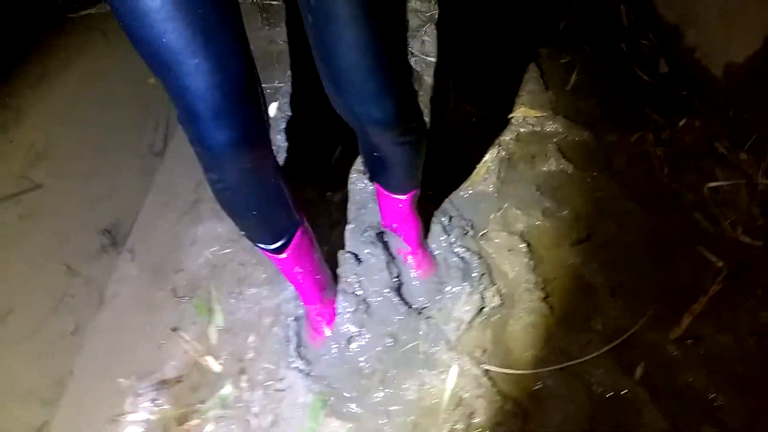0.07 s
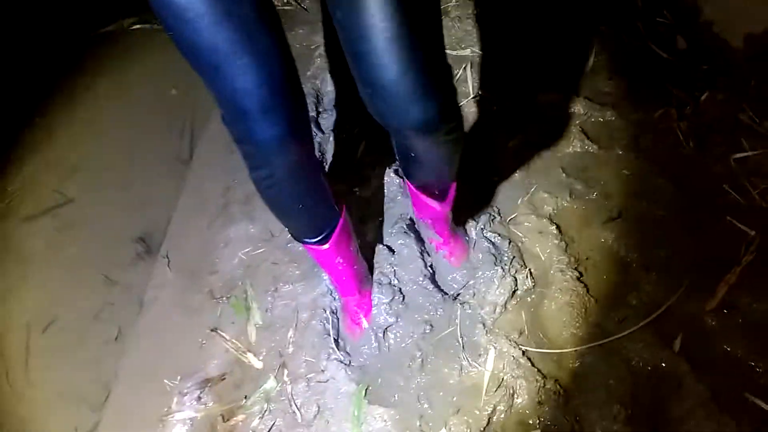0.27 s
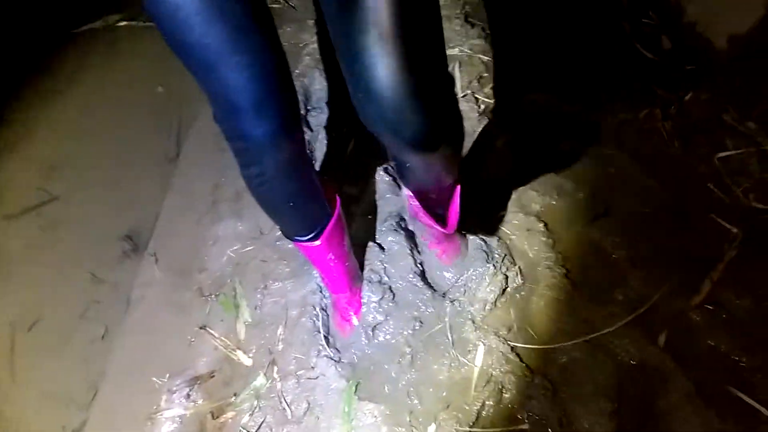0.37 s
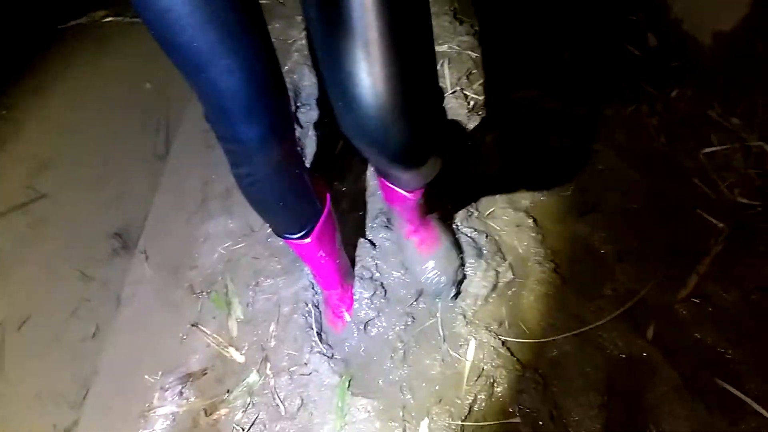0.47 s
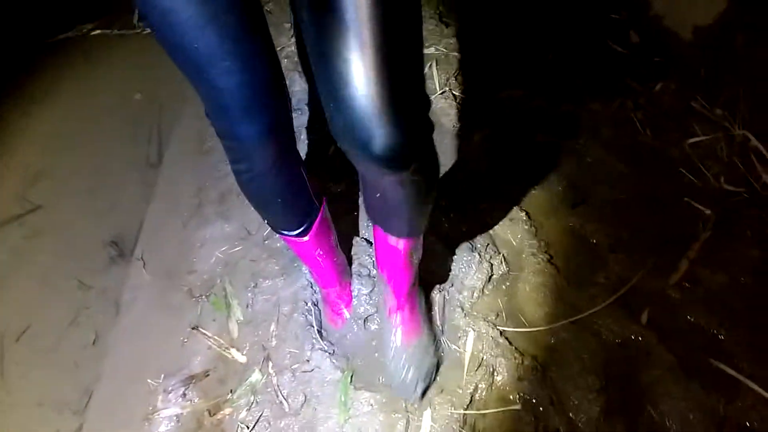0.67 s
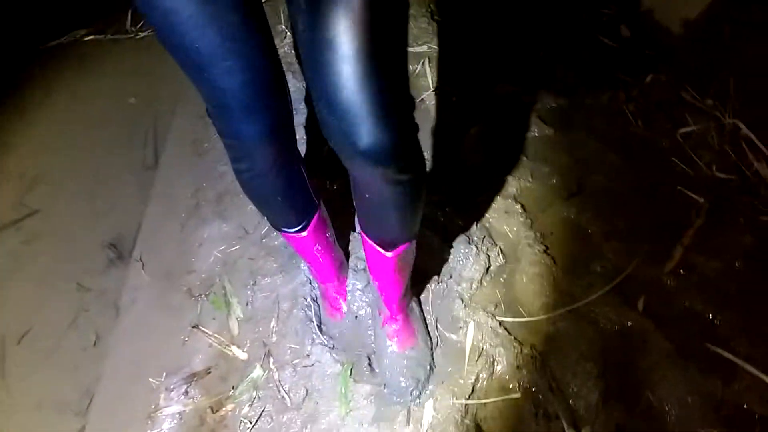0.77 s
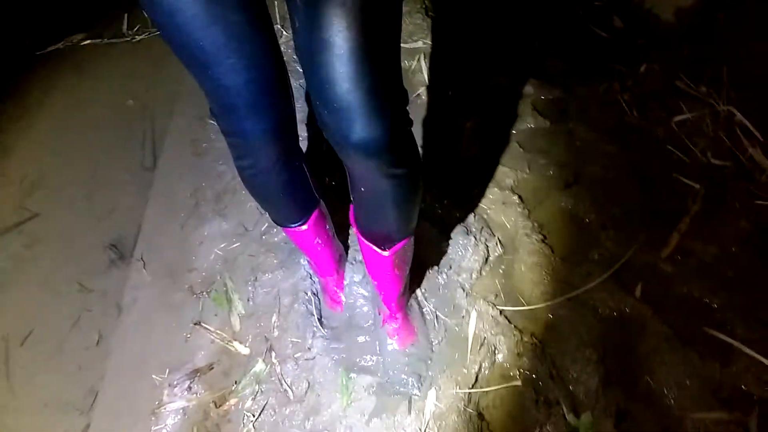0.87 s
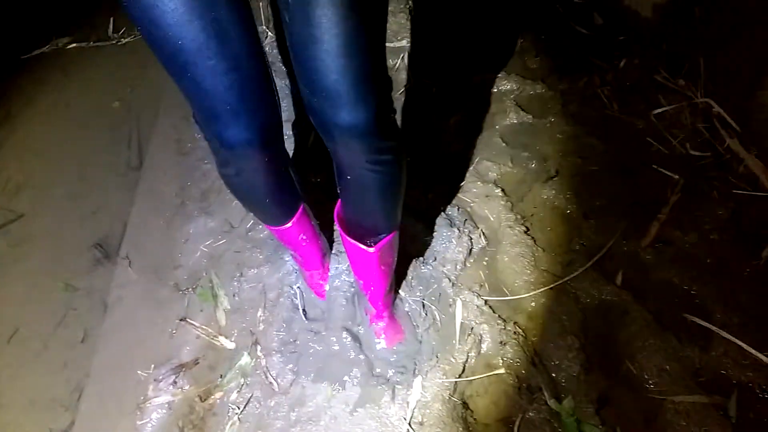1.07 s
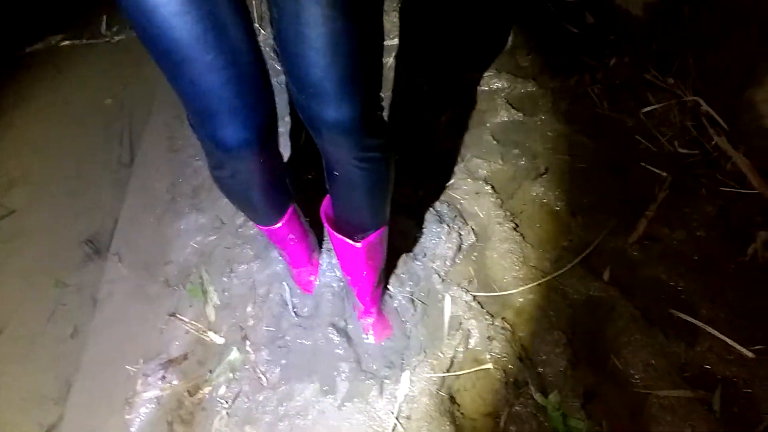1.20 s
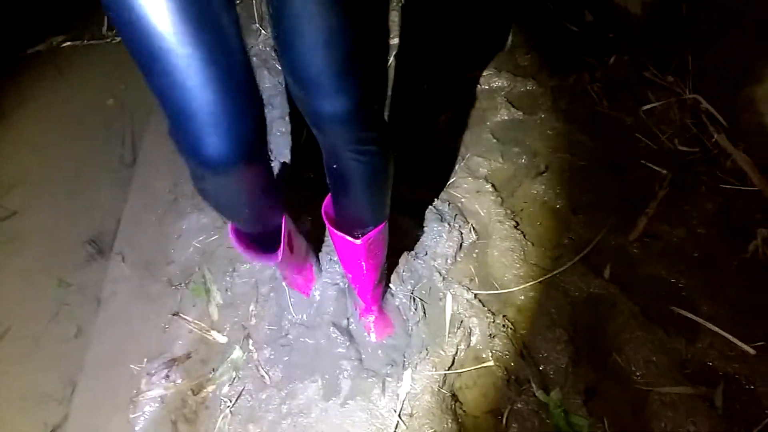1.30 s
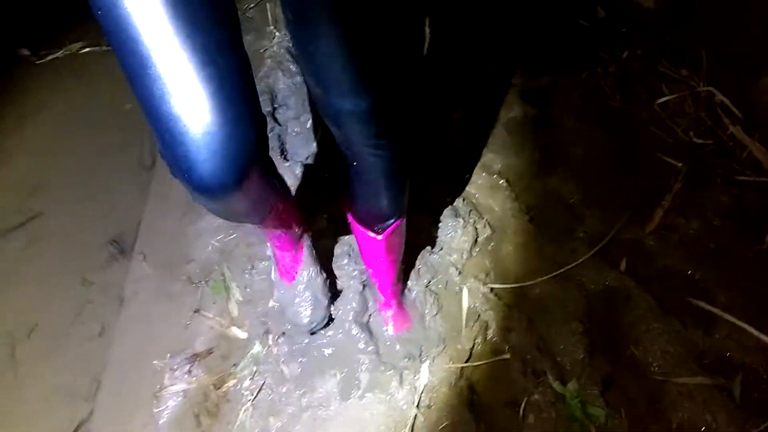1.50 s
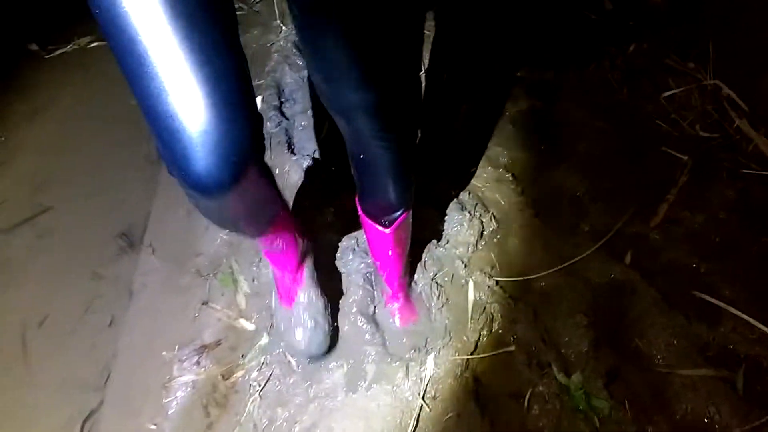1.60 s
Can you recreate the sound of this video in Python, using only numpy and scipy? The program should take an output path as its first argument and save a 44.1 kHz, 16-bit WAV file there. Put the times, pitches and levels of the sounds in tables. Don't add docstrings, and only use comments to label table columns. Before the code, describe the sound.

Boots squelching in sticky mud, heard close in stereo outdoors. Faint hiss, low wind rumble and barely audible rubber squeaks open it. At 0.25 s a loud, abrupt sucking pop tears free with wet crackle, fading by 0.33 s. Small blips follow near 0.43 and 0.49 s. A softer, brighter squelch with clicks runs 0.75-0.9 s, then a faint one at 1.25 s; tiny ticks and thin squeaks end it around 1.5-1.65 s.

```python
import sys
import numpy as np
from scipy import signal
from scipy.fft import rfft, irfft
from scipy.io import wavfile
from scipy.ndimage import uniform_filter1d

SR = 44100
rng = np.random.default_rng(int(sys.argv[2]) if len(sys.argv) > 2 else 0)


def put_to_file(sound):
    columns = np.atleast_2d(sound).T
    safe = np.clip(columns, -1, 1)
    whole_steps = np.round(safe * 32767)
    wavfile.write(sys.argv[1], SR, whole_steps.astype(np.int16))


def gain_from_decibels(decibels):
    exponent = np.asarray(decibels, float) / 20
    return 10 ** exponent


N = 72765


def rms_one(x):
    return x / np.sqrt(np.mean(x ** 2) + 1e-20)


def at_hz(points, hz):
    table_hz, value = np.transpose(points)
    return np.interp(np.log(hz), np.log(table_hz), value)


def in_time(rows):
    s, value = np.transpose(rows)
    return np.interp(np.arange(N) / SR, s, value)


def spectrum_hz():
    return np.maximum(np.arange(N // 2 + 1) * SR / N, 1)


def drift(rate_hz):
    pole = np.exp(-80 * np.pi * rate_hz / SR)
    white = rng.standard_normal(N // 40 + 2002)
    slow = signal.lfilter([1], [1, -2 * pole, pole * pole], white)[2000:]
    return np.interp(np.arange(N) / 40, np.arange(len(slow)), rms_one(slow))


def add(out, s, sound):
    i = int(s * SR)
    out[..., i:i + sound.shape[-1]] += sound[..., :N - i]


def band_pass(edges_hz, x):
    return signal.sosfilt(signal.butter(2, edges_hz, "band", fs=SR, output="sos"), x)


# f/Hz, lead/rad
PORT_LEAD = [(100, .1), (700, .8), (1400, 1.3), (3400, 1.7), (6200, 2.2), (9500, 2.3), (13000, 1.6)]
# f/Hz, level/dB
PORT_BALANCE = [(200, .5), (700, 1.5), (1400, 4), (2750, 10), (3600, 4), (6000, 1.5), (15000, -.5)]


def ports(x):
    hz = spectrum_hz()
    half = gain_from_decibels(at_hz(PORT_BALANCE, hz) / 2) * np.exp(.5j * at_hz(PORT_LEAD, hz))
    return irfft(rfft(x) * np.array([half, 1 / half]), N)


# f/Hz, correlation/1
LIKENESS = [(40, 0.45), (130, 0.48), (290, 0.9), (640, 0.62), (1400, -0.2), (15000, 0.14)]


def banded_noise(spectrum, edges_hz, patchy_db):
    out, together = 0, drift(8)
    white = rng.standard_normal((2, 2, N + 8000))
    for k, (low, high) in enumerate(zip(edges_hz, edges_hz[1:])):
        mid, side = band_pass([low, high], white[k % 2])[:, -N:]
        hz = np.sqrt(low * high)
        alike = np.clip(at_hz(LIKENESS, hz), -.95, .95)
        gain = gain_from_decibels(at_hz(spectrum, hz) + patchy_db * (0.48 * together + drift(11.2)))
        out = out + gain * (np.sqrt(1 + alike) * mid + np.sqrt(1 - alike) * side * [[1], [-1]])
    return rms_one(out)


# f/Hz, level/dB
NIGHT = [(150, -26), (300, -7.5), (500, -11), (1000, -13), (2500, -14), (5000, -16.5), (16000, -21)]
# t/s, level/dB
HISS_SWELL = [(0, 0), (.3, 3), (.65, -.5), (1.0, 0.4), (1.3, 2), (1.65, -1)]


def night_hiss():
    noise = banded_noise(NIGHT, 180 * 2 ** np.arange(0, 6.6, .5), patchy_db=.7)
    return gain_from_decibels(-53.5 + in_time(HISS_SWELL)) * noise


# f/Hz, level/dB
WIND = [(18, -15), (45, 1.85), (95, 2.35), (145, -8.5), (260, -19)]
# t/s, level/dB
GUST = [(0, -53), (.2, -53), (.29, -52), (.335, -45), (.40, -55), (.47, -54), (.51, -45), (.62, -55),
        (.695, -45), (.8, -50), (.9, -52), (.94, -47), (1.12, -51), (1.23, -42), (1.31, -48), (1.41, -53),
        (1.47, -44), (1.65, -51)]


def wind():
    noise = banded_noise(WIND, 18 * 2 ** np.arange(0, 4.1, .5), patchy_db=2.1)
    power = np.mean(noise ** 2, 0)
    strength = np.sqrt(uniform_filter1d(uniform_filter1d(power, size=1800), size=1800))
    return gain_from_decibels(in_time(GUST)) * noise / strength ** .85


OWN_SHARE_DB = -5.0
# t/s, level/dB,
# centre f/Hz, decay T60/ms
TICKS = [(0.009, -42, 4970, 10), (0.318, -41.5, 8500, 20), (0.346, -45.5, 7200, 24), (.395, -53, 6000, 12),
         (.574, -49, 2950, 20), (0.6, -48, 7400, 83), (0.704, -49, 7800, 12), (0.757, -32.5, 6700, 19),
         (0.788, -30, 6300, 16), (.8175, -35, 8800, 10), (.849, -52, 9500, 8), (.8605, -58, 9500, 8),
         (.8925, -32.5, 10000, 7.2), (0.8943, -45, 1900, 9.1), (.947, -45.5, 3970, 15),
         (0.837, -38, 1750, 8.7), (0.489, -35, 180, 66), (1.29, -47, 9300, 21), (.222, -44.5, 4370, 81),
         (.256, -37, 510, 102), (0.2599, -22.5, 1650, 37), (0.7715, -23.5, 11000, 16.4),
         (.255, -38, 200, 86), (0.8943, -42, 3800, 10), (1.055, -41, 9400, 10), (1.079, -42, 8000, 6.7),
         (1.090, -43.5, 8500, 8), (1.132, -42.5, 9900, 7.2), (1.251, -44, 7300, 80), (1.472, -42, 7360, 11)]
# t/s, level/dB, centre f/Hz, decay T60/ms
SNAPS = [(.2535, -22, 9200, 14), (.2572, -22, 9500, 18), (.2635, -30, 8900, 40), (.2750, -30, 9000, 25),
         (.8920, -42, 4300, 10), (1.2670, -44, 7200, 40), (1.2570, -46, 5800, 25), (1.2900, -46, 4400, 30),
         (1.2910, -47, 7500, 20), (1.1380, -47, 4500, 15), (1.4720, -46, 5000, 10), (.4340, -45, 3000, 12),
         (.0020, -50, 1400, 40), (1.1000, -52, 3000, 40), (.7680, -36, 3400, 16), (.7730, -34, 5200, 14),
         (.7850, -40, 3000, 12), (.8530, -47, 3200, 30), (.8660, -46, 3100, 20), (.8780, -47, 3600, 15),
         (1.2680, -46, 2800, 45), (1.2700, -47, 1400, 40), (.8370, -45, 1000, 18), (.2560, -24.5, 5800, 20),
         (.2448, -32, 4300, 10), (.2640, -29, 5200, 50), (1.3950, -48, 7400, 25), (.2680, -26, 14500, 60),
         (1.2560, -45, 1050, 50), (.4870, -45, 1050, 15), (1.2740, -47, 750, 50)]


def ticks(table):
    half_width_octaves = .32
    out, t = np.zeros((3, N)), np.arange(3000) / SR
    whites = rng.standard_normal((len(table), 3, len(t)))
    for (s, db, hz, t60_ms), white in zip(table, whites):
        edges_hz = np.minimum(hz * 2 ** (half_width_octaves * np.array([-1, 1])), .45 * SR)
        attack = np.minimum(t / 0.0002, 1)
        add(out, s, rms_one(band_pass(edges_hz, white)) * gain_from_decibels(db - 60000 * t / t60_ms) * attack)
    return ports(out[0]) + out[1:] * gain_from_decibels(OWN_SHARE_DB)


# t/s, peak level/dB, first f/Hz, last f/Hz, length/ms
SLIDES = [(.2800, -30, 2230, 1930, 13), (.2680, -25, 1480, 1280, 9), (.4868, -35, 740, 500, 6.5),
          (.8120, -42, 2250, 3100, 5), (.8365, -40, 900, 2600, 3), (.8395, -41, 3600, 5300, 3.5),
          (1.3352, -43, 900, 300, 3.5), (1.397, -51, 500, 800, 5), (1.401, -52, 1100, 1300, 7),
          (.5050, -49, 1450, 1520, 8), (.4900, -48, 1500, 1550, 4), (.8930, -45, 1700, 1900, 3),
          (.8180, -46, 1100, 850, 3), (1.2570, -51, 2200, 2500, 8), (1.2700, -47, 600, 400, 10),
          (1.2810, -48, 1600, 1700, 4), (1.3150, -50, 5000, 5200, 8), (.2650, -33, 480, 530, 11),
          (.2710, -38.5, 790, 760, 11), (.2445, -30, 1650, 1580, 5), (.3750, -50, 1000, 1100, 5),
          (.0630, -52, 900, 1000, 5), (1.4720, -50, 1400, 1700, 5), (1.2900, -50, 1300, 1200, 10)]


def slides():
    out = np.zeros(N)
    for s, db, first_hz, last_hz, ms in SLIDES:
        u = np.linspace(0, 1, int(ms * SR / 1000))
        phase = 2 * np.pi * np.cumsum(first_hz * (last_hz / first_hz) ** u) / SR
        add(out, s, gain_from_decibels(db) * np.sin(np.pi * u ** 0.75) * np.sin(phase))
    return ports(out)


# t/s, level/dB, f/Hz, length/ms
SQUEAKS = [
    (.095, -55, 2200, 31),
    (.136, -55, 1960, 36),
    (1.50, -58, 1480, 45),
    (1.60, -55, 2820, 42),
    (1.635, -56, 1950, 12),
]
SQUEAK_OVERTONES_DB = [-4.0, -9.0]


def squeaks():
    out = np.zeros(N)
    for s, db, hz, ms in SQUEAKS:
        u = np.linspace(0, 1, int(ms * SR / 1000))
        phase = 2 * np.pi * np.cumsum(hz * (1 - 0.03 * (u - .5))) / SR
        tone = np.sin(phase)
        for harmonic, overtone_db in enumerate(SQUEAK_OVERTONES_DB, 2):
            tone = tone + gain_from_decibels(overtone_db) * np.sin(harmonic * phase)
        add(out, s, gain_from_decibels(db) * np.sin(np.pi * u) * tone)
    return ports(out)


# t/s, peak level/dB, f/Hz, length/ms
POCKETS = [(0.2448, -18, 2400, 2), (0.248, -20, 2480, 1.2), (0.253, -15, 1600, 3.4),
           (0.2571, -6.5, 1613, 3.63), (1.268, -49, 750, 6.8), (0.2654, -18.5, 1740, 4.1),
           (0.2679, -18.5, 2005, 3.1), (.2696, -14, 1550, 2.5), (.2722, -19, 1480, 2.95),
           (0.2748, -22.5, 2000, 5.7), (.2540, -28, 3000, 8), (.2900, -38, 2520, 7),
           (0.4341, -39.5, 1770, 5.0), (.2770, -30, 4850, 5), (.7453, -28.5, 1920, 1.2),
           (0.7470, -33.5, 4600, 5), (0.7498, -27, 2470, 3.7), (.7630, -34.5, 1967, 19),
           (.880, -48, 970, 3.4), (0.7735, -26.5, 6900, 2.5), (0.8081, -31.5, 1300, 1.3),
           (.2670, -27, 2800, 6), (.8165, -35, 5000, 3.6), (0.8385, -32, 3050, 3.5), (1.2535, -39, 1653, 7),
           (1.257, -37, 1228, 6), (.8418, -41, 3000, 3.5), (1.5105, -48.5, 860, 5.3), (.2080, -47, 475, 12),
           (.2560, -35, 800, 19)]


def pockets():
    swell_share, pitch_rise = 0.39, 0.041
    second_mode, second_mode_db, pop_db = 1.43, -16.0, -7.0
    out = np.zeros(N)
    for (s, db, hz, ms), turn in zip(POCKETS, rng.random(len(POCKETS))):
        u = np.linspace(0, 1.6, int(1.6 * ms * SR / 1000))
        swell = np.sin(np.pi / 2 * np.minimum(u / swell_share, 1))
        closing = np.exp(-np.maximum((u - swell_share) / 0.4, 0) ** 2)
        phase = 2 * np.pi * np.cumsum(hz * (1 + pitch_rise * (u - .5))) / SR
        upper = gain_from_decibels(second_mode_db) * np.sin(second_mode * phase + 2 * np.pi * turn)
        pop = gain_from_decibels(pop_db) * np.sin(phase * 2) * np.exp(-phase / 2)
        add(out, s, gain_from_decibels(db) * (swell * closing * (np.sin(phase) + upper) + pop))
    return ports(out)


# t/s, level/dB
SUCTION = [
    [(.2435, -87), (.2452, -24.5), (.252, -37.5), (.2545, -14), (.263, -24.5), (.277, -23), (.283, -35),
     (.295, -40), (.33, -53)],
    [(.7445, -60), (.7462, -34), (.764, -39), (.774, -28.5), (.783, -38), (.797, -44), (.82, -47),
     (.93, -53)],
    [(1.248, -70), (1.255, -41.5), (1.275, -50), (1.295, -49.5), (1.34, -64)],
]
FILM_TILT_DB = [-1.6, 1.8, 0]
# f/Hz, level/(dB per Hz)
FILM = [(120, -72), (450, -4), (1000, -14), (1700, 10), (3200, 4), (5000, 12), (9000, 1.5), (15500, -2.5)]


def film(suction, tilt_db):
    grains_per_s, spread_db, t60_ms = 16000, 3.9, 7.0
    start, size = int(suction[0][0] * SR), int((suction[-1][0] - suction[0][0]) * SR)
    shape = (3, SR // 4)
    grains = gain_from_decibels(spread_db * np.minimum(rng.exponential(1, shape), 4)) * rng.choice([-1, 1], shape)
    grains *= rng.random(shape) < grains_per_s / SR
    grains *= gain_from_decibels(np.resize(in_time(suction)[start:start + size], shape[1]))
    grains[:, size:] = 0
    pitches, tear = np.geomspace(200, 15000, 40), 0
    share = pitches ** .7 / np.sum(pitches ** .7)
    dealt = np.searchsorted(np.cumsum(share), rng.random(shape))
    for k, hz in enumerate(pitches):
        r = gain_from_decibels(-60000 / (t60_ms * (3000 / hz) ** .5 * SR))
        w = 2 * np.pi * hz / SR
        struck = grains * (dealt == k) + 1e-18
        ring = signal.lfilter([0, np.sin(w)], [1, -2 * r * np.cos(w), r * r], struck)
        even = np.sqrt((1 - r) * hz / (40 * share[k] * grains_per_s))
        tear = tear + ring * even * gain_from_decibels(at_hz(FILM, hz) + tilt_db * np.log2(hz / 3000))
    out = np.zeros((3, N))
    add(out, suction[0][0], tear)
    return gain_from_decibels(3) * (ports(out[0]) + out[1:] * gain_from_decibels(OWN_SHARE_DB))


def scene():
    air = night_hiss() + wind()
    tears = sum(film(suction, tilt_db) for suction, tilt_db in zip(SUCTION, FILM_TILT_DB))
    return air + ticks(SNAPS) + ticks(TICKS) + slides() + squeaks() + pockets() + tears


def band_limit(x):
    return signal.sosfilt(signal.butter(12, 16500, fs=SR, output="sos"), x)


# f/Hz, level/dB
MICROPHONE = [(6000, -0.7), (8000, 1.5), (9400, 4.5), (10600, -3), (13000, -8.0), (16300, -17)]


def record(dry):
    overload, cutoff_hz, offset = .85, 16700, .0012
    rounded = overload * np.tanh(dry / overload)
    coloured = irfft(rfft(rounded) * gain_from_decibels(at_hz(MICROPHONE, spectrum_hz())), N)
    top_cut = signal.cheby2(10, 60, cutoff_hz, fs=SR, output="sos")
    finished = signal.sosfilt(top_cut, coloured) + offset
    return band_limit(finished)


dry = scene()
out = record(dry)
put_to_file(out)
```